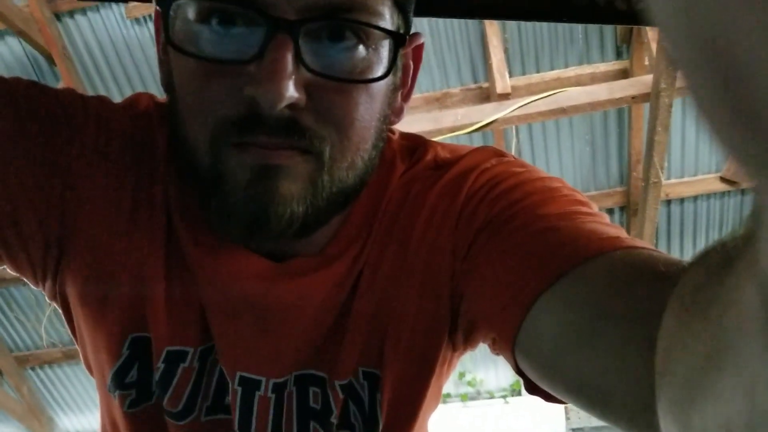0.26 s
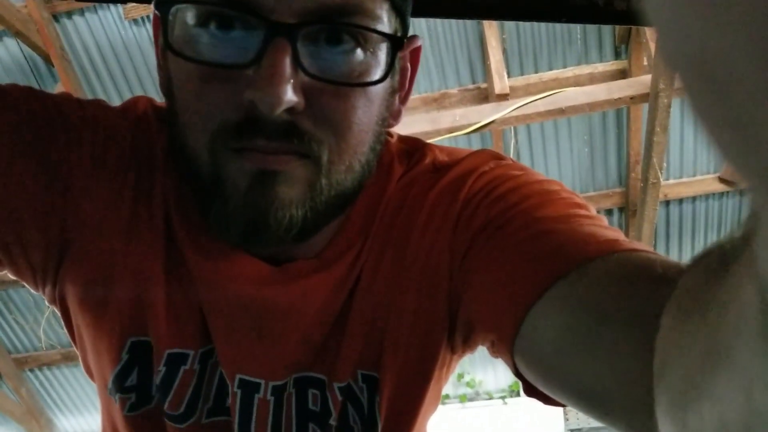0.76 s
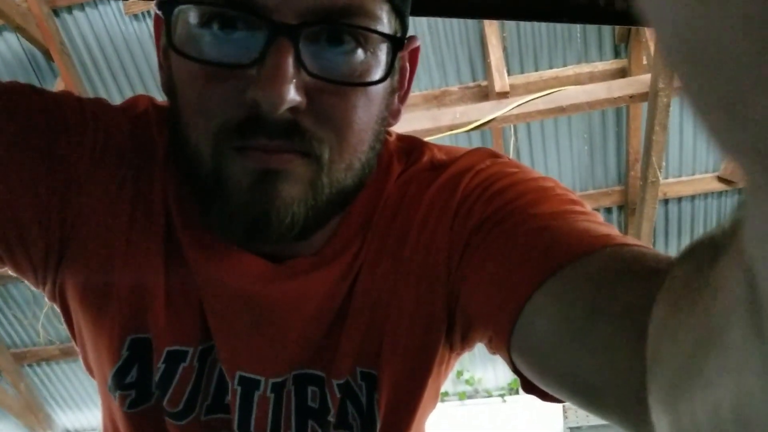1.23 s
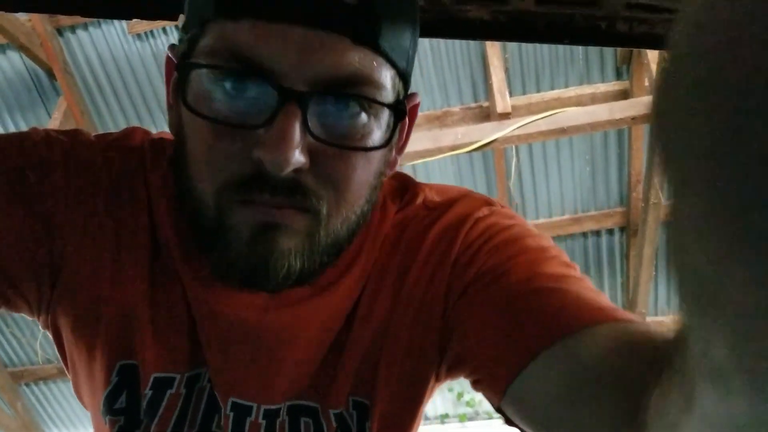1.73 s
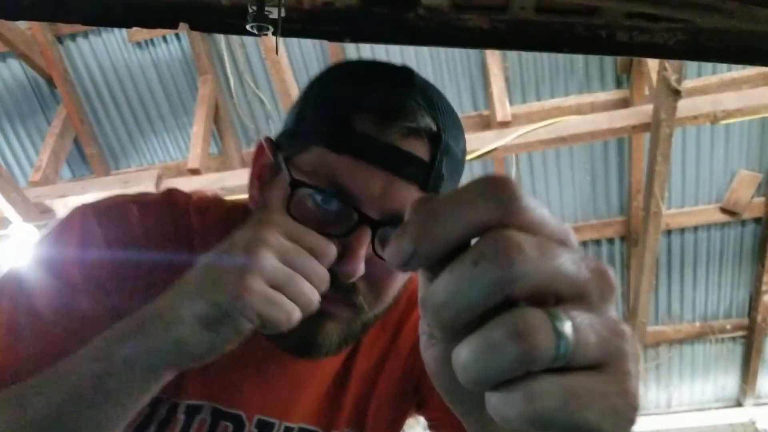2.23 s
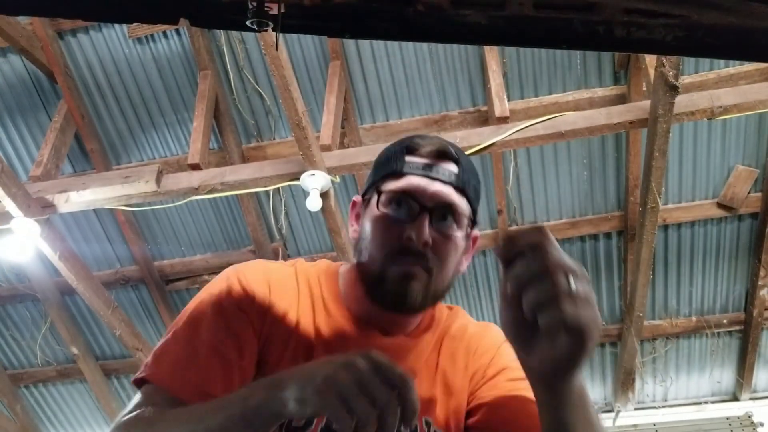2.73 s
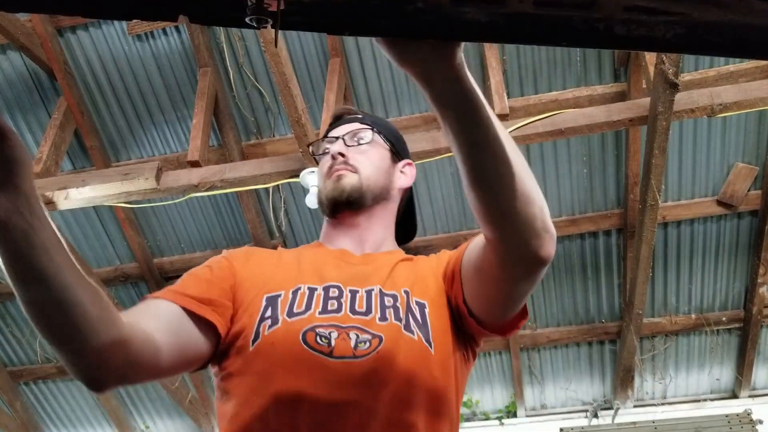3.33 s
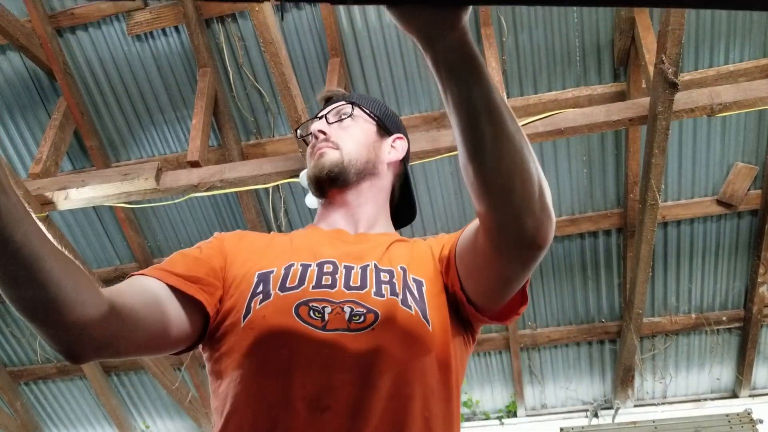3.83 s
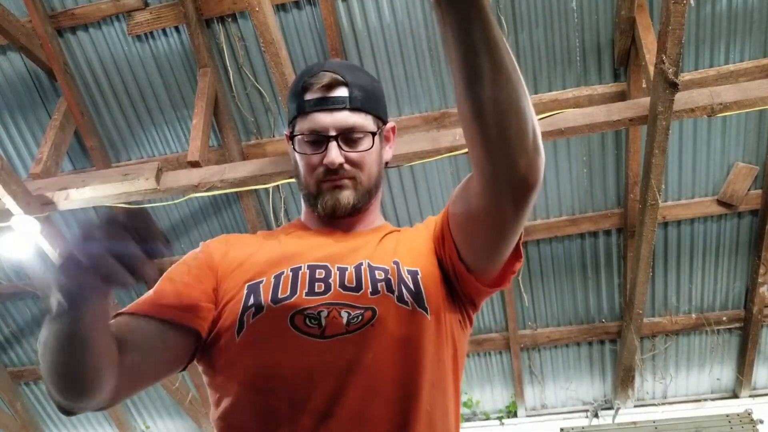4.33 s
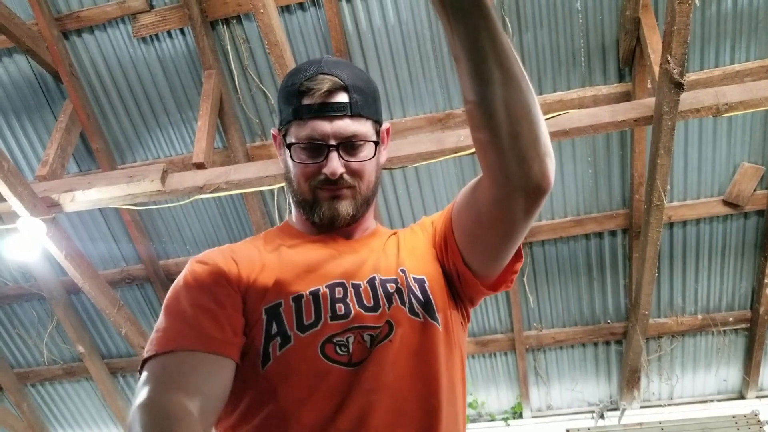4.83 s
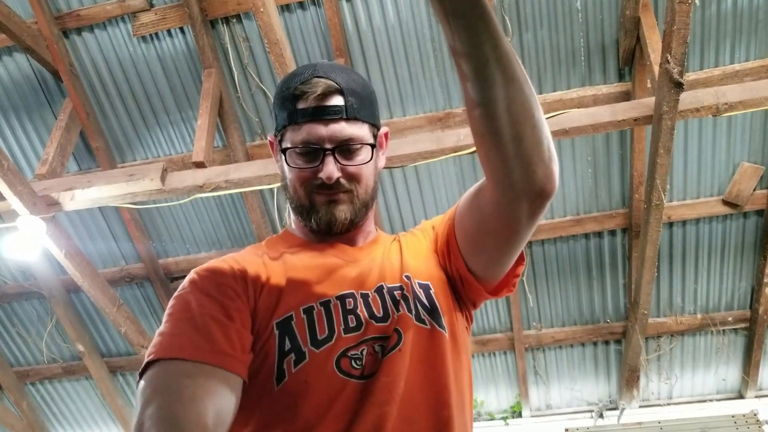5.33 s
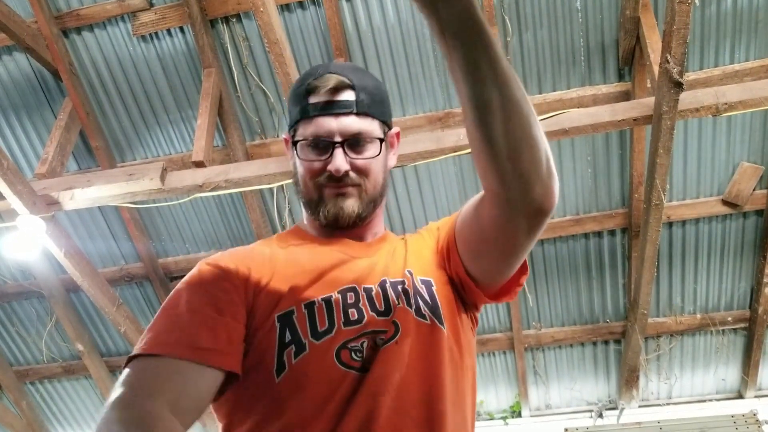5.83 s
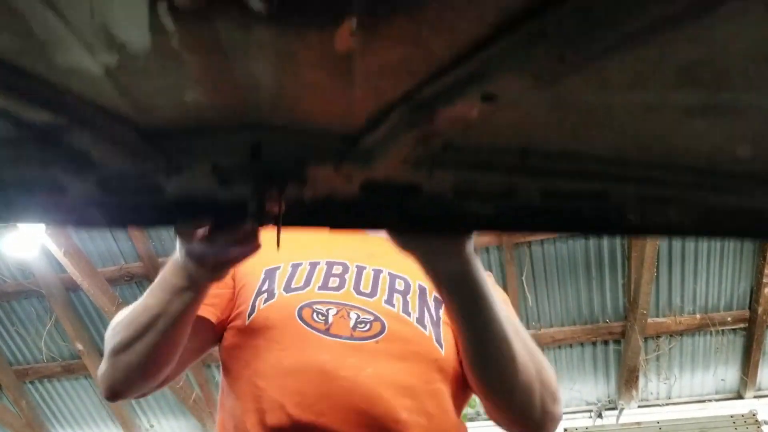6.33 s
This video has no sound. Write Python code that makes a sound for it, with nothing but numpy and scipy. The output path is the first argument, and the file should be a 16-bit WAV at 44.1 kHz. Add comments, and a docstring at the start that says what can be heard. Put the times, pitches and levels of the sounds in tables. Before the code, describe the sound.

Close handling knocks and finger rubs, light metal clicks, a sheet-metal hood clunk, then a prop rod scraping, ticking and dropping with a sharp clank.

```python
"""Over a low outdoor rumble and port hiss, fingertips slide on a phone propped in a car's engine bay: noise strokes
and short resonances, in a tin-roofed barn. Light clicks follow, then the hood is pushed up against its stop with
a clunk: a push into ringing panel modes. The prop rod is taken out, scrapes, ticks and drops into its rest:
stick-slip jerks and blows on steel modes. Last, the hood starts down on its hinges, the sheet metal booming softly."""
import sys
import numpy as np
from scipy import signal
from scipy.fft import rfft, irfft, next_fast_len
from scipy.io import wavfile

SR = 44100
rng = np.random.default_rng(int(sys.argv[2]) if len(sys.argv) > 2 else 0)


def persist_wave(psi):
    """Save psi, clipped to +-1, as 16-bit WAV."""
    counts = np.round(np.clip(psi, -1, 1) * 32767).astype(np.int16)
    wavfile.write(sys.argv[1], SR, np.atleast_2d(counts).T)


N = 289760
TIME = np.arange(N) / SR

# In every colour table, the dB column sets only the balance between its rows;
# in ROD_MODES and HOOD_MODES it also sets how far the clear modes stand out from the crowded ones.
# background level, sinking while hands are near the phone: time_s, relative_db
FLOOR = [(0, -1.5), (1.2, -0.5), (1.75, -8), (2.17, -6), (2.28, 0), (6.57, 3)]
# outdoor rumble: freq_hz, density_db (per Hz)
AIR_COLOUR = [(20, -15), (50, -10.5), (80, 3), (105, -1), (180, -12), (300, -15.5), (520, -18.5),
              (1000, -28.5), (2000, -40), (6000, -41.5), (16000, -73.5)]
# hiss of the microphone ports: freq_hz, density_db (per Hz)
HISS_COLOUR = [(1000, -8), (4000, -19), (6700, -14.5), (7300, -5), (7750, -2), (8300, -9), (9200, -23),
               (11000, -18), (16000, -30)]
# the two ports: freq_hz, left_right_likeness (-1 to 1), left_over_right_db
PORTS = [(100, 0.97, -.5), (306.5, 0.84, -2), (580, .55, -2.5), (1213, -0.14, -3), (2510, 0.12, -4),
         (4560, 0.022, -6.5), (7500, 0, -2), (11300, 0.028, 8), (14000, 0.32, -1)]
# sleeves rustling and the rod passing through the hand: start_s, length_s, level_db
RUB = [(1.39, 0.077, -66.5), (2.225, 0.12, -61.5), (2.3, 0.51, -59.5), (2.475, 0.092, -58.5),
       (2.572, .075, -46), (3.25, .17, -61), (4.04, 0.63, -53.5), (4.46, 0.83, -63), (5.52, 0.12, -52),
       (6.18, 0.19, -56)]
# cloth and hand noise: freq_hz, density_db (per Hz)
RUB_COLOUR = [(300, 8), (1000, -6), (2200, 5.5), (4200, 5.5), (7000, 3), (9000, -12), (12000, -4),
              (16000, -25)]
# brief scuffs of skin on the case: start_s, level_db, pitch_hz
SCUFFS = [(0.06, -36.5, 1750), (0.361, -51, 3770), (0.379, -53.5, 3440), (0.467, -57.5, 3500),
          (0.919, -32.5, 2830), (0.9597, -27, 5900), (1.055, -45, 4930), (1.082, -42.5, 3400),
          (1.194, -46, 4900), (1.207, -39.5, 5070), (1.223, -39.5, 5270), (1.288, -51, 4920)]
# light clicks of hands, latch and rod clip: start_s, level_db, pitch_hz, t60_s
TICKS = [(1.949, -43, 4600, 0.098), (2.069, -35, 4580, 0.038), (2.18, -39.5, 3900, 0.024),
         (3.729, -40, 5730, 0.27), (3.758, -37, 6140, 0.11), (4.113, -46, 3200, 0.27),
         (5.846, -34.5, 6900, 0.041), (5.849, -47, 4400, 0.15), (5.996, -54, 5700, 0.14)]
# fingertips sliding over the case: start_s, length_s, drive_db, fastest_point (share of length), hiss_pitch_hz
STROKES = [(0.041, 0.25, -46.5, 0.68, 4550), (0.273, 0.23, -62, 0.27, 4470), (0.551, 0.41, -49, 0.32, 5200),
           (.94, 0.16, -53.5, 0.23, 5200)]
# soft rub of skin: freq_hz, density_db (per Hz)
SKIN = [(60, -4), (220, 4.5), (400, 0), (650, -1), (1000, -6.5), (1800, -12.5), (3000, -16.5), (6500, -16),
        (9000, -36.5), (11000, -17), (12500, -29), (15500, -26.5)]
# sharp knocks on the case: start_s, level_db, left_over_right_db
KNOCKS = [(0.0448, -32, -4), (0.9917, -20.5, -28.5), (0.9942, -9.5, -20.5), (0.9965, 4, -31.5),
          (1.0135, -12.5, -21), (1.027, -26.5, -17.5)]
# ringing of the case: mode_hz, relative_db, t60_s
CASE = [(600, -19.5, 0.0066), (1993, -15.5, .005), (2887, -2.5, 0.0026), (4170, 6.5, 0.0023),
        (5140, -6.5, 0.0015), (10500, 0.5, 0.00097)]
# soft bumps of the phone on its perch: start_s, level_db, pitch_hz, t60_s
BUMPS = [(0.064, -28.5, 1113, 0.044), (.064, -28, 546, 0.036), (.28, -26, 220.5, .068),
         (0.5273, -11.5, 266, 0.022), (.553, -15, 211, 0.016), (.763, -30, 713, 0.029),
         (.879, -25.5, 300, 0.069), (.959, -35, 383, 0.044), (1.0146, -10.5, 282, 0.018),
         (1.0256, -10.5, 364, 0.013), (1.2, -30, 340, 0.016)]
# the phone trembling on its perch: freq_hz, density_db (per Hz)
JUDDER = [(60, -12), (200, 3.5), (850, -6.5), (1300, -18.5), (6000, -42.5)]
# contacts of the prop rod: start_s, push_db, contact_cutoff_hz, clink_db, clink_pitch_hz, zing_db
ROD_BLOWS = [(4.213, -46, 2500, -40, 3700, -56), (4.263, -36, 2500, -33.5, 5900, -32),
             (4.287, -27, 555, -52, 4040, -61), (4.461, -38.5, 1390, -54, 4200, -48.5),
             (4.572, -37.5, 4170, -47, 3970, -46), (4.727, -45.5, 3970, -37, 4200, -40.5),
             (4.814, -43.5, 3540, -34, 4240, -50), (4.952, -54.5, 2980, -38.5, 4900, -65),
             (5.051, -50.5, 3000, -47, 4570, -60), (5.16, -47.5, 4000, -39, 4300, -46),
             (5.3189, -19, 16000, -25, 4500, -35)]
# clear modes of the rod: mode_hz, relative_db, t60_s
ROD_MODES = [(320, -7, 0.38), (484, -8.5, 0.41), (510, -8, 0.53), (709.4, -6.5, 0.29), (1020, -44, 0.9),
             (1292, -2.5, 0.17), (1500, -12, 0.16), (1650, -11, 0.18), (1780, -11.5, 0.36),
             (1905, -7, 0.19), (2186, -17.5, 0.56), (2515, -24, 0.36), (3050, -20, 0.19), (3446, -20, 0.35),
             (4560, -7, 0.15)]
# crowded modes of the rod: freq_hz, density_db (per Hz), t60_s
ROD_WASH = [(60, -21, 1), (195, -8.5, 1), (347, -4, 0.75), (800, 4, 0.19), (860, -5.5, 0.48),
            (1800, 1, 0.13), (2570, -2.5, 0.11), (3140, -6, 0.12), (4350, -8.5, 0.1), (7400, -14, 0.11),
            (9350, -28.5, 0.17), (11900, -19, 0.17), (16200, -42, 0.14)]
# the rod sliding along its clip and the bodywork: start_s, length_s, drive_db
SLIDE = [(4.21, 0.11, -45.5), (4.47, 0.4, -47), (4.66, 0.64, -57)]
# blows on the hood: start_s, push_db, contact_cutoff_hz
HOOD_BLOWS = [(3.508, -52.5, 1200), (3.566, -33, 235), (3.6103, -16.5, 16000), (3.753, -30, 4950),
              (3.766, -29.5, 2900), (4.23, -34.5, 131), (5.803, -27, 122), (5.836, -21.5, 161),
              (5.838, -41.5, 885), (6.187, -25, 286), (6.2, -39, 906)]
# clear modes of the panel: mode_hz, relative_db, t60_s
HOOD_MODES = [(101.3, -9.5, 0.82), (137, -20.5, 2.1), (232.9, -16.5, 0.94), (276.4, -15, 0.57),
              (312.5, -20, 0.87), (407, -15, 0.33), (524, -11.5, 0.71), (535, -18, 0.83),
              (682, -17.5, 0.55), (753, -11, 0.35), (890, -29, 0.2), (1553, -6, 0.069), (1736, -13.5, 0.49),
              (2150, -19.5, 0.33)]
# crowded modes of the panel: freq_hz, density_db (per Hz), t60_s
HOOD_WASH = [(35.2, -11, 1), (80, 2.5, 1), (180, -2.5, 1), (420, -3.5, 0.94), (573, 5, 0.48),
             (1050, -0.5, 0.33), (2060, -2.5, 0.26), (3130, -6, 0.21), (4900, -4, 0.1), (7000, -5, 0.059),
             (8550, -18, 0.062), (11100, -15, 0.1), (16000, -19.5, 0.059)]
# jerks of the dragging hinges: start_s, length_s, drive_db
HINGE = [(3.52, .12, -66), (3.69, 0.14, -28.5), (5.832, 0.21, -41.5), (6.187, 0.23, -43)]
# panel wobbles after each pull downwards: start_s, length_s, drive_db
FLEX = [(5.8, 0.86, -42), (6.19, 0.44, -38)]
# boom of the wobbling panel: freq_hz, density_db (per Hz)
FLEX_COLOUR = [(25, -32), (50, 2), (75, 4.5), (110, -1), (170, 1.5), (260, -9), (500, -54), (1500, -90)]

BARN_T60_S, CUTOFF_HZ = 0.58, 16000
ATTACK_S = 0.0008   # how fast a steel contact builds up
# a scuff this loud lasts this long; so many dB harder, half as long
SCUFF_DB, SCUFF_T60_S, SCUFF_HALVING_DB = -43.5, 0.084, 13.5
RATTLE_LAG_S, RATTLE_DB, RATTLE_HZ = 0.012, -29, 4500   # the loose latch answers every blow, so far below it
ZING_HZ, ZING_T60_S, CLINK_T60_S = 12670, 0.059, 0.056   # the rod's tip rings at every contact


def from_db(db):
    """Decibels to gain."""
    return 10 ** (np.asarray(db) / 20)


def rms_one(x):
    """Scale to unit rms."""
    return x / np.sqrt(np.mean(x ** 2) + 1e-20)


def at_hz(rows, hz):
    """Every column of a table, read on a log-frequency axis."""
    known, *columns = np.transpose(rows)
    return [np.interp(np.log(hz + 1e-9), np.log(known), c) for c in columns]


def pan(db):
    """Left and right gains of unit mean power; positive leans left."""
    return rms_one(from_db([[db / 2], [-db / 2]]))


def dying(t, t60):
    """Exponential decay that falls 60 dB in t60."""
    return np.exp(-np.log(1000) * t / t60)


def add(out, s, sound):
    """Mix a sound in from time s."""
    start = round(s * SR)
    out[..., start:start + sound.shape[-1]] += sound[..., :N - start]


def soften(x, hz):
    """Two-pole low-pass: a soft contact."""
    return signal.sosfilt(signal.butter(2, hz, fs=SR, output="sos"), x)


def resonance(x, hz, width_hz):
    """One broad resonance, gain about 1 on top."""
    r = np.exp(-np.pi * width_hz / SR)
    zeros = np.array([1, 0, -1]) * (1 - r * r) / 2
    poles = [1, -2 * r * np.cos(2 * np.pi * hz / SR), r * r]
    return signal.lfilter(zeros, poles, x)


def double_resonance(x, hz, width_hz):
    """The same resonance twice over, for steeper skirts, at unit rms."""
    return rms_one(resonance(resonance(x, hz, width_hz), hz, width_hz))


def diffuse(colour, size):
    """Coloured stereo noise as the two ports hear it: alike in the bass, mostly unrelated above."""
    padded = next_fast_len(size, True)
    hz = np.fft.rfftfreq(padded, 1 / SR)
    alike, lean_db = at_hz(PORTS, hz)
    mid, side = rfft(rng.standard_normal((2, padded)))
    both = np.sqrt(1 + alike) * mid + np.sqrt(1 - alike) * side * [[1], [-1]]
    port_db = at_hz(colour, hz)[0] + np.array([lean_db, -lean_db]) / 2
    return rms_one(irfft(both * from_db(port_db), padded)[:, :size])


def many_modes(colour, size, spacing, clarity, melt_hz):
    """Endless ringing of upper modes at random pitches, about `spacing` of their pitch apart, blurred by rattle."""
    mode_hz = 850 * np.exp(spacing * (np.arange(1000) + 3 * rng.random(1000)))
    bins = np.round(mode_hz[mode_hz < CUTOFF_HZ] * size / SR).astype(int)
    hz = np.fft.rfftfreq(size, 1 / SR)
    clear = clarity * (hz >= mode_hz.min()) / (1 + (hz / melt_hz) ** 2)   # high modes melt into the rattle
    power = 1 - clear
    power[bins] += (clear * hz * spacing * size / SR)[bins]   # each mode carries the power of the gap around it
    return rms_one(irfft(rfft(diffuse(colour, size=size)) * np.sqrt(power), size))


def metal(modes, wash, hold_s, barn_db, spacing, clarity):
    """Response to one blow: clear modes over crowded ones, held briefly by echoes in the bay, then the barn's tail."""
    t = TIME[:2 * SR]
    crowd = rfft(many_modes(wash, size=len(t), spacing=spacing, clarity=clarity, melt_hz=8100))
    hz = np.fft.rfftfreq(len(t), 1 / SR)
    late = np.maximum(t - hold_s, 0)
    out = from_db(barn_db) * diffuse(wash, size=len(t)) * dying(t, BARN_T60_S)
    # overlapping bands, each with its own decay
    for (_, _, t60), own in zip(wash, np.eye(len(wash))):
        share = np.interp(np.log(hz + 1), np.log([row[0] for row in wash]), own)
        out += irfft(crowd * share) * dying(late, t60)
    for mode_hz, db, t60 in modes:
        alike, lean_db = at_hz(PORTS, mode_hz)
        apart = np.arccos(alike) / 2 * np.array([[1], [-1]])   # high modes reach the ports out of step
        ring = np.sin(2 * np.pi * mode_hz * t + apart) * dying(t, t60)
        out += from_db(db) * pan(lean_db) * ring
    return out / out[:, :SR // 40].std() * (1 - np.exp(-t / ATTACK_S))


def force(blows):
    """One push for each blow, as soft as its contact."""
    out = np.zeros(N)
    for s, db, contact_hz in blows:
        add(out, s, from_db(db) * soften(signal.unit_impulse(SR // 10), contact_hz))
    return out


def played(body, push):
    """A body's answer to a force."""
    return signal.fftconvolve(body, push[None])[:, :N]


def slips(per_s, spread_db):
    """Stick and slip: random small jerks of uneven size, rms 1."""
    sizes = from_db(spread_db * rng.standard_normal(N)) * rng.choice([-1, 1], N)
    return rms_one(sizes * (rng.random(N) < per_s / SR))


def chatter(rows, skirt_db, barn_db, rise_s, spacing):
    """Small contacts: a cluster of modes around one pitch, skirt_db down an octave below, and a faint tail."""
    out, t = np.zeros((2, N)), TIME[:SR // 2]
    for s, db, hz, t60, lean_db in rows:
        hump = [(hz / 8, 2 * skirt_db), (hz / 2, skirt_db), (hz, 0), (hz * 2, 1.5 * skirt_db), (hz * 4, 2 * skirt_db)]
        cluster = many_modes(hump, size=len(t), spacing=spacing, clarity=0.96, melt_hz=11960)
        cluster = np.array([rms_one(side) for side in cluster])
        decay = np.hypot(dying(t, t60), from_db(barn_db) * dying(t, BARN_T60_S / 2))
        shape = decay * (1 - np.exp(-t / rise_s))
        add(out, s, from_db(db) * pan(lean_db) * cluster * shape)
    return out


def gesture(start, length, db, peak_share, onset_db, taper, ease_s):
    """Gain of one movement: it eases in at onset_db, swells to its peak and has lost 20 dB at its end."""
    along = (TIME - start) / length
    rise = np.clip(1 - along / peak_share, 0, 1)
    fall = np.maximum((along - peak_share) / (1 - peak_share), 0)
    ease = np.clip((TIME - start) / ease_s, 0, 1)
    return ease * from_db(db + onset_db * rise - 20 * np.minimum(fall ** taper, 10))


def gestures(rows, peak_share, onset_db, taper, ease_s):
    """Gain of several movements of the same shape."""
    return sum(gesture(*row, peak_share, onset_db, taper, ease_s) for row in rows)


def background(air_db=-54.5, hiss_db=-66.5, muffle_hz=8500):
    """Low rumble from outdoors and the hiss of the microphone ports, which dulls as it sinks."""
    floor = from_db(np.interp(TIME, *np.transpose(FLOOR), left=-200, right=-200))
    hiss = diffuse(HISS_COLOUR, size=N)
    open_share = np.minimum(floor, 1) ** 4
    hiss = np.sqrt(open_share) * hiss + np.sqrt(1 - open_share) * soften(hiss, muffle_hz)
    air = diffuse(AIR_COLOUR, size=N)
    return floor * (from_db(air_db) * air + from_db(hiss_db) * hiss)


def rubbing(uneven_db=2.0, catch_hz=45):
    """Cloth and steel slide, catching unevenly: coloured noise whose level wavers slowly."""
    catching = from_db(uneven_db * rms_one(soften(rng.standard_normal(N), catch_hz)))
    movement = gestures(RUB, peak_share=0.28, onset_db=-6.5, taper=1.46, ease_s=0.025)
    return movement * catching * diffuse(RUB_COLOUR, size=N)


def ticks(scuff_lean_db=-21, tick_lean_db=-4):
    """Scuffs on the case are close and dry, the harder the shorter; metal ticks ring into the barn."""
    scuffs = []
    for s, db, hz in SCUFFS:
        t60 = SCUFF_T60_S * 0.5 ** ((db - SCUFF_DB) / SCUFF_HALVING_DB)
        scuffs.append((s, db, hz, t60, scuff_lean_db))
    clicks = [(*tick, tick_lean_db) for tick in TICKS]
    return (chatter(scuffs, skirt_db=-9.0, barn_db=-37.5, rise_s=0.0014, spacing=0.0045)
            + chatter(clicks, skirt_db=-11.5, barn_db=-21.5, rise_s=0.002, spacing=0.022))


def fingers(skin_db=5.5, hiss_db=1.0, hiss_width_hz=1200, sheen_db=-9, sheen_hz=14800, sheen_width_hz=2500,
            brisk_db=-48):
    """Skin drags over the case next to the right port: a soft rub, a narrow hiss and a thin sheen above it."""
    out = np.zeros((2, N))
    skin = from_db(skin_db) * diffuse(SKIN, size=N) * pan(db=-3)
    grit = slips(per_s=7100, spread_db=4.5)
    sheen = from_db(sheen_db) * double_resonance(grit, sheen_hz, sheen_width_hz)
    for *stroke, hz in STROKES:
        speed = gesture(*stroke, onset_db=-7, taper=2.1, ease_s=0.0037)
        hiss = from_db(hiss_db) * double_resonance(grit, hz, hiss_width_hz)
        bright = speed / from_db(brisk_db)   # a fast stroke hisses more
        out += speed * (bright * (hiss + sheen) * pan(db=-14) + skin)
    return out


def phone(buzz_db=-13, linger=2.2, rock_lean_db=5, overtone=2.6, overtone_db=-10, overtone_lean_db=-13):
    """Knocks ring the stiff case for a few milliseconds; bumps rock it, and it judders on its perch."""
    out, t = np.zeros((2, N)), TIME[:SR // 5]
    case = sum(from_db(db) * np.sin(2 * np.pi * hz * t) * dying(t, t60) for hz, db, t60 in CASE)
    case /= np.abs(case).max()
    for s, db, lean_db in KNOCKS:
        add(out, s, from_db(db) * pan(lean_db) * case)
    for s, db, hz, t60 in BUMPS:
        swell = 1 - np.exp(-t * hz)   # builds up over about one cycle
        rock = pan(rock_lean_db) * np.sin(2 * np.pi * hz * t)
        twist = from_db(overtone_db) * pan(overtone_lean_db) * np.sin(2 * np.pi * overtone * hz * t)
        judder = from_db(buzz_db) * diffuse(JUDDER, size=len(t)) * dying(t, linger * t60)
        add(out, s, from_db(db) * swell * ((rock + twist) * dying(t, t60) + judder))
    return out


def sliding():
    """Gain of the rod's slides."""
    return gestures(SLIDE, peak_share=0.22, onset_db=-7, taper=1.1, ease_s=0.018)


def rod_tip(clink_lean_db=-6, zing_lean_db=7, sizzle_db=-13, sizzle_width_hz=2500):
    """At each contact the rod's tip gives a clink and, far above it, a short zing; sliding, it sizzles at that pitch."""
    clinks = [(s, db, hz, CLINK_T60_S, clink_lean_db) for s, _, _, db, hz, _ in ROD_BLOWS]
    zings = [(s, db, ZING_HZ, ZING_T60_S, zing_lean_db) for s, *_, db in ROD_BLOWS]
    grit = double_resonance(slips(per_s=1500, spread_db=5), ZING_HZ, sizzle_width_hz)
    sizzle = from_db(sizzle_db) * sliding() * pan(zing_lean_db) * grit
    return chatter(clinks + zings, skirt_db=-25, barn_db=-17, rise_s=0.002, spacing=0.037) + sizzle


def rod(scrape_bright_hz=2500, ping_hz=12460, ping_db=-26, ping_t60_s=0.73):
    """The steel rod knocks against the body and drops into its rest; sliding, it scrapes only the crowded modes."""
    modes = ROD_MODES + [(ping_hz, ping_db, ping_t60_s)]   # the ping is the bar's thin, long ring
    body = metal(modes, ROD_WASH, hold_s=0.019, barn_db=-11.0, spacing=0.03, clarity=0.59)
    # the hand damps the clear modes
    gripped = metal([], ROD_WASH, hold_s=0.0025, barn_db=-43, spacing=0.04, clarity=0.71)
    jerks = slips(per_s=190, spread_db=4.0)
    jerks = rms_one(jerks - 0.5 * soften(jerks, scrape_bright_hz))   # light touches favour the treble
    scrape = sliding() * jerks / np.sqrt(np.sum(gripped ** 2) / 2)   # the rod's own gain is taken out
    knocks = force([row[:3] for row in ROD_BLOWS])
    return played(body, knocks) + played(gripped, scrape)


def hood(hinge_cut_hz=800, flex_db=-2):
    """The panel is struck at its stop, shaken by the dragging hinges, and wobbles on the way down."""
    body = metal(HOOD_MODES, HOOD_WASH, hold_s=0.011, barn_db=-15, spacing=0.02, clarity=0.35)
    jerks = rms_one(soften(slips(per_s=540, spread_db=4), hinge_cut_hz))
    drag = gestures(HINGE, peak_share=0.17, onset_db=-9, taper=1.28, ease_s=0.005) * jerks
    drag /= np.sqrt(np.sum(body ** 2) / 2 * SR / hinge_cut_hz / 4)   # the panel's own gain is taken out
    wobble = gestures(FLEX, peak_share=0.26, onset_db=-3.5, taper=1.65, ease_s=0.012)
    flex = from_db(flex_db) * wobble * diffuse(FLEX_COLOUR, size=N)
    rattle = [(s + RATTLE_LAG_S, db + RATTLE_DB, RATTLE_HZ) for s, db, _ in HOOD_BLOWS]
    return played(body, force(HOOD_BLOWS) + force(rattle) + drag) + flex


def scene():
    """Everything as heard from inside the engine bay."""
    return background() + rubbing() + ticks() + fingers() + phone() + rod_tip() + rod() + hood()


def record(dry):
    """Peaks stop at full scale, then a steep low-pass cuts the top."""
    low_pass = signal.ellip(10, 0.1, 80, CUTOFF_HZ, fs=SR, output="sos")
    return signal.sosfilt(low_pass, np.clip(dry, -1, 1))


dry = scene()
out = record(dry)
persist_wave(out)
```